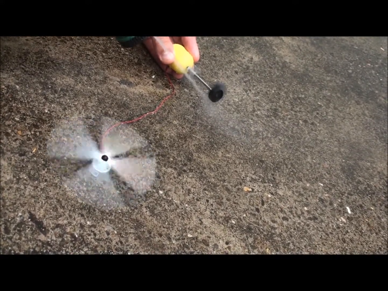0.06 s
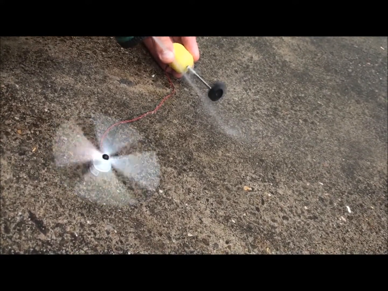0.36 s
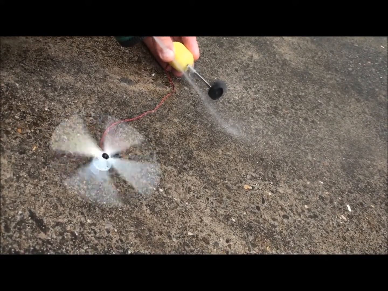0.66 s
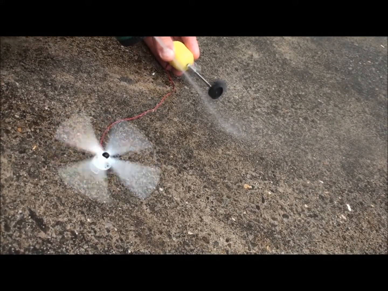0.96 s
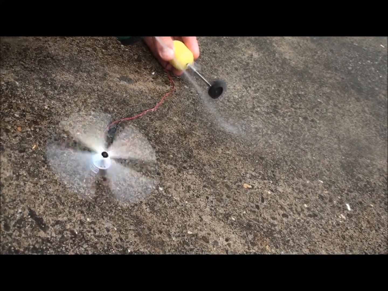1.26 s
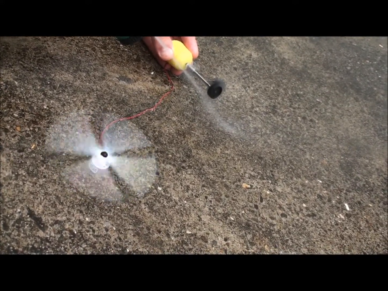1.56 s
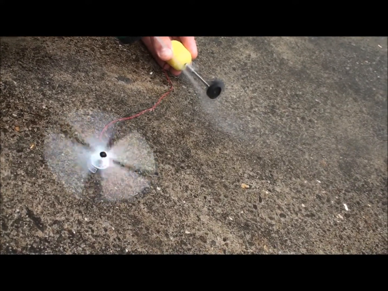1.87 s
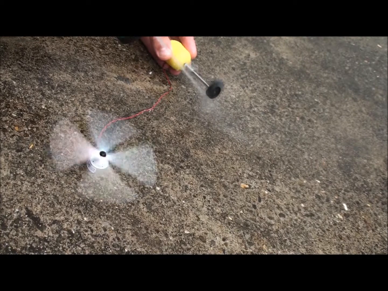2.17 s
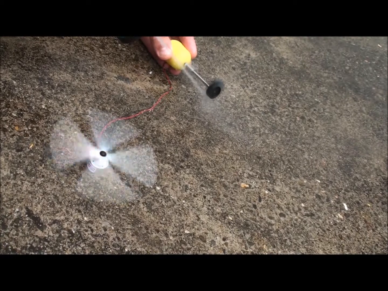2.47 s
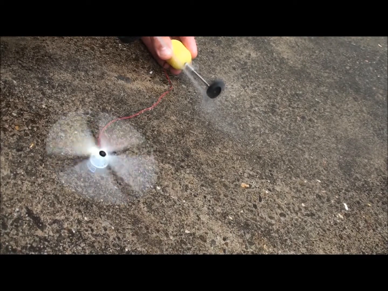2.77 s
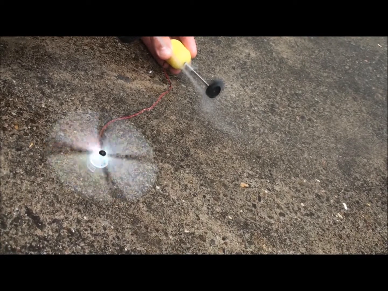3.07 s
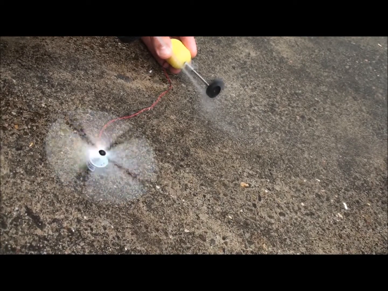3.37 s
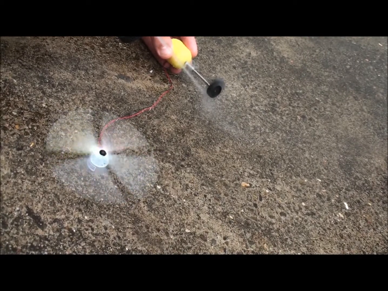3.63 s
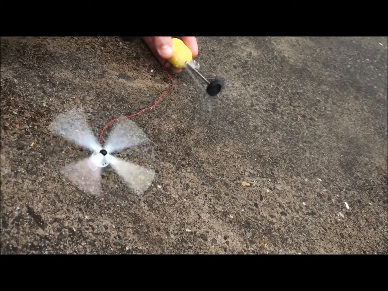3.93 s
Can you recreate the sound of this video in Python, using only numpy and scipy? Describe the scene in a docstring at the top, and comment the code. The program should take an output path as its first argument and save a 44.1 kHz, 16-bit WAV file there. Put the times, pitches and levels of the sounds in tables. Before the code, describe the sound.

Close up in the open air, water splashes steadily against whirling plastic blades, with fizzing spray, sharp drop ticks and a low whir. The jet finally leaves the wheel, which coasts quietly as water trickles on the ground.

```python
"""Water jet on a small plastic wheel

Close microphone on a four-bladed wheel above wet concrete, in the open air. The broken jet patters on
the ringing blades and bursts into hissing spray; the passing blades hum and slowly lose speed. Near
the end the jet leaves the wheel, and only the trickle on the ground and the coasting hum remain."""
import sys
import numpy as np
from scipy import signal
from scipy.fft import rfft, irfft
from scipy.io import wavfile

SR = 44100
rng = np.random.default_rng(int(sys.argv[2]) if len(sys.argv) > 2 else 0)


def store_wav(level_fs):
    """Save 16-bit WAV to argv[1]."""
    pcm = np.round(np.clip(np.atleast_2d(level_fs), -1, 1) * 32767)
    wavfile.write(sys.argv[1], SR, pcm.T.astype(np.int16))


N = 176400

# How hard the jet plays on the wheel. Each row: time in seconds, then relative levels in dB of the
# blades' low ring, the splash, the fine spray and the blades' bright ring.
JET = [(0.0, -33, -31, -34.5, -35.5), (0.5, -30, -30.2, -32, -32), (0.64, -30.5, -29, -30.5, -35),
       (0.72, -31, -30, -29.5, -27.5), (0.82, -30, -30, -32.5, -33), (0.9, -29, -28.5, -30.5, -33.5),
       (1.02, -30.5, -31, -33.5, -32.5), (1.18, -30, -31, -32, -32.5), (1.24, -32, -32.5, -32.5, -34),
       (1.7, -32, -32, -31.5, -35), (1.99, -33.5, -30.5, -30.5, -33.5), (2.06, -37, -32, -32, -33),
       (2.2, -39, -33.5, -33, -37), (2.58, -37.5, -33, -32, -37), (3.0, -34, -31.5, -31, -34),
       (3.5, -33, -30.5, -29, -32), (3.71, -37, -33, -33.5, -36.5), (3.745, -41, -35, -31.5, -43),
       (3.81, -41.5, -43, -41.5, -53), (3.87, -53, -45, -45.5, -53), (4.0, -55, -57, -58, -62)]
LOW_RING, SPLASH, FINE_SPRAY, BRIGHT_RING = 1, 2, 3, 4


def amp(db):
    return 10 ** (np.asarray(db) / 20)


def unit(x):
    """Scales to rms 1."""
    return x / np.sqrt(np.mean(x ** 2) + 1e-20)


def curve(table, column=1):
    """One column of a time table at every sample."""
    table = np.array(table)
    return np.interp(np.arange(N) / SR, table[:, 0], table[:, column])


def gains(spectrum):
    """Rows of frequency in Hz and gain in dB, as gains on the FFT bins."""
    hz, db = np.transpose(spectrum)
    return amp(np.interp(np.log(np.fft.rfftfreq(N, 1 / SR) + 1), np.log(hz), db))


def colour(x, spectrum):
    """Minimum-phase filter with the given spectrum."""
    log_gain = np.log(gains(spectrum))
    phase = -signal.hilbert(np.r_[log_gain, log_gain[-2:0:-1]]).imag[:len(log_gain)]
    return irfft(rfft(x) * np.exp(log_gain + 1j * phase), N)


def wander(hz):
    """Smooth random drift up to about the given rate, rms 1."""
    f = np.fft.rfftfreq(N, 1 / SR)
    return unit(irfft(rfft(rng.standard_normal(N)) * np.exp(-(f / hz) ** 2 / 2), N))


def slugs(slowest_hz=22, fastest_hz=91):
    """The jet's uneven flow, rms 1: quick bunches of water with little slow drift."""
    f = np.fft.rfftfreq(N, 1 / SR)
    band = np.exp(-(f / fastest_hz) ** 2 / 2) * f / np.hypot(f, slowest_hz)
    return unit(irfft(rfft(rng.standard_normal(N)) * band, N))


def drops(per_s, spread_db):
    """A random train of impacts of uneven size, rms 1."""
    size = amp(spread_db * np.minimum(rng.exponential(1, N), 4))
    return unit(size * rng.choice([-1., 1.], N) * (rng.random(N) < per_s / SR))


def die_away(hits, decay_s):
    """Gives each hit an exponential tail."""
    return signal.lfilter([1], [1, -np.exp(-1 / (decay_s * SR))], hits)


def bursts(per_s, decay_s, depth):
    """Gain of spray that flares at each impact and dies away."""
    hits = (rng.random(N) < per_s / SR) * 2 * rng.random(N)
    return np.sqrt(1 + depth * die_away(hits, decay_s))


def glancing(from_s=1.15, to_s=2.03):
    """The jet drifts from striking squarely (0) to glancing off (1)."""
    return curve([(from_s, 0), (to_s, 1)])


def ground():
    """Run-off on the concrete, open-air rumble, and the jet's low buffeting."""
    # Each row of both: frequency in Hz, relative spectral level in dB.
    runoff_spectrum = [(15, -12.5), (90, 0.5), (150, -4.5), (320, -6), (480, -11.5), (620, -6), (780, -11),
                       (1100, -7.5), (1380, -11), (1560, -4), (1950, -14.5), (2600, -19.5), (10000, -28.5),
                       (16000, -41)]
    buffet_spectrum = [(15, -18), (35, -8), (50, 6), (75, -23), (100, -5), (112, 1.5), (124, 4), (138, 2.5),
                       (165, -2.5), (300, -10), (600, -21), (1500, -57)]
    trickle = drops(per_s=4000, spread_db=2.5) + rng.standard_normal(N)
    runoff = unit(colour(trickle, runoff_spectrum)) * amp(-44)
    buffet = unit(colour(rng.standard_normal(N), buffet_spectrum))
    return runoff + buffet * amp(curve(JET, LOW_RING) - 20)


def hum(jitter_rad=0.34):
    """Each passing blade pushes the air: a low harmonic hum, with a half order from the wheel's wobble."""
    # Each row: time in seconds, blade passes per second.
    speed = [(0, 63), (.55, 65.6), (1.0, 63.9), (1.5, 65.5), (2.05, 63), (2.4, 62), (2.8, 62), (3.4, 59.7),
             (4, 59)]
    # Each row: time in seconds, relative level of the fundamental in dB.
    fundamental = [(0.0, -36), (0.13, -39.5), (0.2, -47), (0.31, -39), (0.67, -37), (0.8, -44),
                   (0.93, -31.5), (1.09, -35), (1.19, -40.5), (1.55, -37.5), (1.88, -34.5), (2.46, -44.5),
                   (2.58, -40), (2.85, -46.5), (3.1, -44), (3.27, -39), (3.45, -43), (3.56, -37),
                   (3.76, -46), (3.84, -56), (3.91, -46), (4.0, -49)]
    # Each row: time in seconds, relative levels of harmonics 2 and 3 in dB.
    overtones = [(0.0, -62, -65), (0.08, -51, -59), (0.34, -60, -47), (0.91, -43, -50), (1.49, -48, -55),
                 (2.06, -62, -47), (2.24, -60, -58.5), (2.28, -45, -56.5), (2.88, -67, -44.5),
                 (3.94, -55, -55.5), (4.0, -52, -58)]
    # Each row: time in seconds, levels of the half order and of harmonics 4 and 5 in dB.
    faint = [(0, -55, -59, -68), (1.1, -58, -61.5, -58), (3.3, -69, -60, -64), (3.9, -64, -51.5, -59)]
    pass_hz = curve(speed) * (1 + 0.0039 * wander(hz=8))
    phase = 2 * np.pi * np.cumsum(pass_hz) / SR
    orders = [(2, curve(overtones, 1) + 0.5), (3, curve(overtones, 2) + 0.5),
              (0.5, curve(faint, 1)), (4, curve(faint, 2)), (5, curve(faint, 3))]
    out = amp(curve(fundamental) - 0.5 + wander(hz=14)) * np.sin(phase)
    for order, db in orders:
        level = amp(db + 0.26 * wander(hz=11))
        jitter = jitter_rad * wander(hz=22)  # no two blade passes are quite alike
        out += level * np.sin(order * phase + jitter + 2 * np.pi * rng.random())
    return np.sqrt(2) * out


def bubble(hz, decay_s, glide=0.0015):
    """One bubble rings briefly, rising a little in pitch."""
    t = np.arange(1400) / SR
    age = t / decay_s
    return (1 - np.exp(-4 * age)) * np.exp(-age) * np.sin(2 * np.pi * hz * t * (1 + glide * age))


def plinks(per_s=28, low_hz=2240, high_hz=2775, pitches=24):
    """Air trapped in the splash rings as small bubbles, quieter once the jet glances off."""
    out = np.zeros(N)
    for hz in np.linspace(low_hz, high_hz, pitches):
        hits = (rng.random(N) < per_s / pitches / SR) * rng.uniform(0.45, 1, N)
        out += signal.oaconvolve(hits, bubble(hz, decay_s=0.0013))[:N]
    return unit(out) * amp(curve(JET, LOW_RING) - 9.5 - 5 * glancing())


def big_plinks():
    """A few large bubbles stand out of the patter while the jet strikes hardest."""
    # Each row: start in seconds, relative level in dB, pitch in Hz.
    bubbles = [(0.6195, -14.5, 2560), (0.7387, -19, 2600), (0.838, -19, 2272), (0.9023, -19, 2720),
               (0.9403, -29, 2640), (1.0066, -23, 2310), (1.0124, -21, 2670), (1.1029, -25, 2600)]
    out = np.zeros(N)
    for start_s, db, hz in bubbles:
        ring, start = bubble(hz, decay_s=0.005), round(start_s * SR)
        out[start:start + len(ring)] += amp(db + 1) * ring
    return out


def snaps(small_per_s=50):
    """Large drops burst on the wheel, a smack with a bright tick; small ones follow the spray's level."""
    # Each row: start in seconds, relative levels of the smack and of the tick in dB.
    large_drops = [(0.3466, -14, -18), (0.5172, -16, -11), (0.8844, -15, -14), (0.9024, -10, -12),
                   (1.0939, -15, -14), (1.1802, -17, -11.5), (1.731, -15, -12), (1.8951, -14, -15),
                   (2.0218, -12, -11), (2.0428, -15, -13), (2.1355, -12, -13), (2.3466, -18, -13),
                   (2.4349, -13, -15), (2.5601, -11, -19), (2.8584, -14, -13), (3.3628, -14, -14),
                   (3.5695, -12, -15), (3.6391, -22, -14), (3.7995, -34, -23), (3.8262, -19, -29),
                   (3.8995, -26, -42)]
    # Each row of both: frequency in Hz, gain in dB.
    smack_spectrum = [(500, -28), (2000, -3), (4000, -2), (5200, 7), (7000, 9), (8600, 0), (9300, -12),
                      (16000, -30)]
    tick_spectrum = [(500, -45), (7000, -20), (9300, -12), (10800, 8), (13000, 11), (16000, 0)]
    flow, out = amp(curve(JET, FINE_SPRAY)), np.zeros(N)
    falls = rng.random(N) < small_per_s / SR
    small_drops = falls * amp(-27 + 2 * rng.standard_normal(N)) * flow / flow.max()
    for part, spectrum in enumerate([smack_spectrum, tick_spectrum]):
        hits = small_drops.copy()
        for start_s, *db in large_drops:
            hits[round(start_s * SR)] += amp(db[part] - 7.5)
        envelope = die_away(hits, decay_s=0.0006)
        out += colour(envelope * rng.choice([-1., 1.], N), spectrum)
    return out


def spray(surge, drops_per_s=9000):
    """The jet shatters: a splash of dense drops and a finer fizz above it, both flaring at each impact."""
    # The splash, then the fizz of a square and of a glancing jet.
    # Each row: frequency in Hz, relative spectral level in dB.
    splash_spectrum = [(200, -28.5), (800, -11), (1400, -14), (2500, -9), (3300, -2.5), (3750, -4.5),
                       (4300, -1.5), (4780, -4.5), (4960, 1), (5500, -1.5), (6420, -0.5), (6720, 2.5),
                       (7200, 1), (8350, -2.5), (8680, -3.5), (9200, -10), (10500, -16.5), (16000, -40)]
    square_spectrum = [(3000, -17), (8000, -33), (9400, -7.5), (10200, -2), (10850, 5.5), (11150, -1.5),
                       (12000, 2.5), (12950, 3.5), (13400, -6.5), (14200, 1), (15000, -6), (15450, -3.5),
                       (16000, -13.5)]
    glancing_spectrum = [(3000, -38), (8000, -21), (9400, -12), (10200, -4.5), (10850, -3), (11150, 1),
                         (12100, -3), (12700, 5.5), (13400, -4), (14200, 1.5), (15080, -8), (15400, -2),
                         (16000, -3.5)]
    glance = glancing()
    flare = bursts(per_s=150, decay_s=0.00095, depth=2.7)
    coarse = drops(drops_per_s, spread_db=2) + 0.97 * rng.standard_normal(N)
    coarse *= flare * bursts(per_s=200, decay_s=0.00054, depth=0.99)
    coarse *= amp(0.37 * surge + 0.22 * slugs())
    splash = unit(colour(coarse, splash_spectrum))
    fine = drops(drops_per_s, spread_db=0.5) + 0.42 * rng.standard_normal(N)
    fine *= flare * bursts(per_s=310, decay_s=0.0006, depth=1.5)
    fine *= amp(0.25 * surge + 0.99 * slugs())
    fizz = unit(colour(fine, square_spectrum)) * (1 - glance)
    fizz += unit(colour(fine, glancing_spectrum)) * glance
    return splash * amp(curve(JET, SPLASH) - 1) + fizz * amp(curve(JET, FINE_SPRAY) + 1)


def blades(surge, bright_from_hz=2900):
    """Slugs of water ring the plastic blades; each mode is struck by its own train of drops."""
    # Each row: mode frequency in Hz, width in Hz, relative levels in dB for a square and a glancing jet.
    modes = [(1194, 38, -6, -5), (1531, 64, -4, -3.5), (1631, 63, -5, -8), (1860, 116, -8.5, -8.5),
             (2208, 80, 1, 0.5), (2320, 190, -17.5, -12), (2620, 126, -3, -5), (3013, 55, -4.5, -4),
             (3113, 65, 2, 1), (3288, 50, -6, -6.5), (4410, 300, -8.5, -26), (4986, 180, -7, -9.5),
             (5160, 170, -2.5, -0.5), (6070, 91, -13, -8), (6930, 450, -14, -4.5)]
    # The tone of the whole ring. Each row: frequency in Hz, gain in dB.
    ring_spectrum = [(300, -21), (900, -13.5), (1400, -3), (1550, 0), (3300, -0.5), (3600, -9.5), (4400, 2),
                     (4950, -1), (7100, 0.5), (9000, -13)]
    glance, low, bright = glancing(), np.zeros(N), np.zeros(N)
    for hz, width_hz, square_db, glancing_db in modes:
        pole = np.exp((-np.pi * width_hz + 2j * np.pi * hz) / SR)
        hits = drops(per_s=2400, spread_db=1.5) * amp(1.33 * surge + 3 * slugs())
        ring = signal.lfilter([1], [1, -pole], hits).real
        group = bright if hz > bright_from_hz else low
        group += unit(ring) * amp(square_db + (glancing_db - square_db) * glance)
    low = unit(low) * amp(curve(JET, LOW_RING) - 1 + 1.6 * glance)
    bright = unit(bright) * amp(curve(JET, BRIGHT_RING) + 2.1)
    return colour(low + bright, ring_spectrum)


def water():
    """The running water noise; blades and spray surge together as the jet breaks into slugs."""
    surge = slugs()
    return blades(surge) + plinks() + spray(surge) + ground()


def scene():
    """The wheel close up and nearly centred, with a little diffuse water noise at the sides."""
    # Each row: frequency in Hz, gain of the diffuse water noise in dB.
    width = [(70, -34), (125, -32), (250, -19), (500, -11.5), (1100, -11.5), (1300, -22), (1800, -49),
             (2200, -17.5), (2800, -33), (3150, -21.5), (3700, -36), (4400, -15), (5600, -71), (8000, -72),
             (9000, -31), (10000, -10.5), (11200, -14), (11900, -60)]
    # Each row: frequency in Hz, left minus right in dB.
    balance = [(200, 0), (500, .1), (1000, .3), (2200, .8), (4000, .05)]
    mid = rfft(water() + snaps() + big_plinks() + hum())
    side = colour(water(), width)
    lean = np.sqrt(gains(balance))
    return np.array([irfft(mid * lean, N) + side, irfft(mid / lean, N) - side])


def record(dry):
    """The recorder's band limit: a steep low-pass at 15830 Hz."""
    lowpass = signal.firwin(1023, 15830, window=("kaiser", 9), fs=SR)
    return signal.oaconvolve(dry, lowpass[None], "same")


dry = scene()
out = record(dry)
store_wav(out)
```